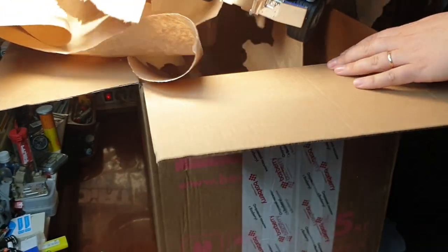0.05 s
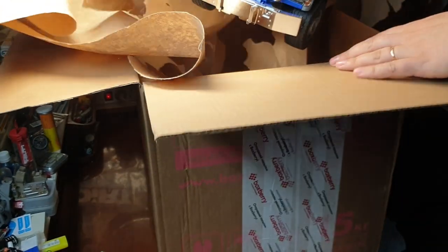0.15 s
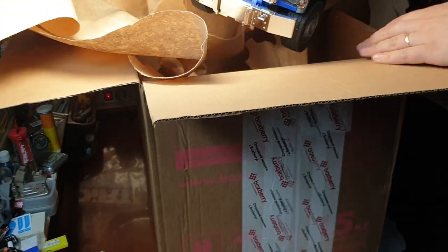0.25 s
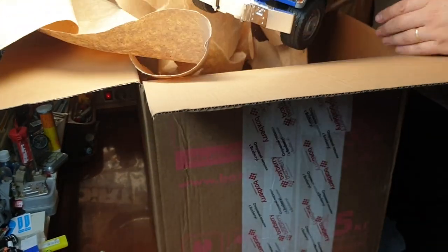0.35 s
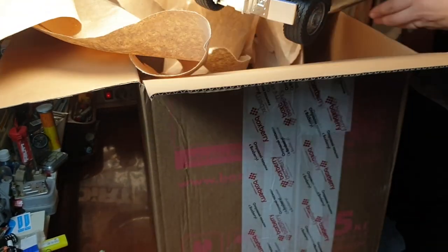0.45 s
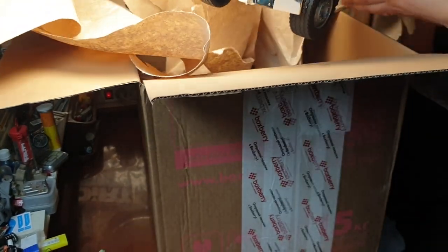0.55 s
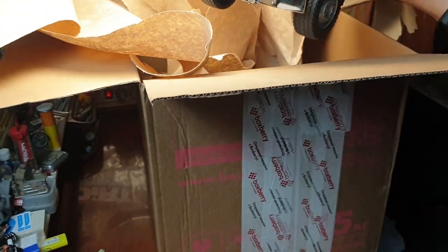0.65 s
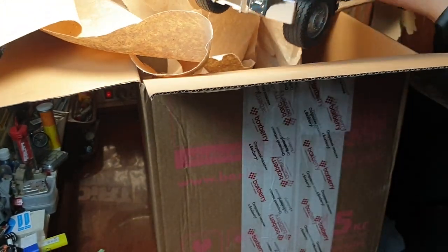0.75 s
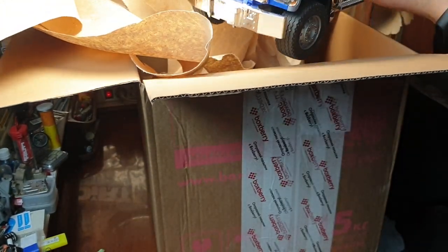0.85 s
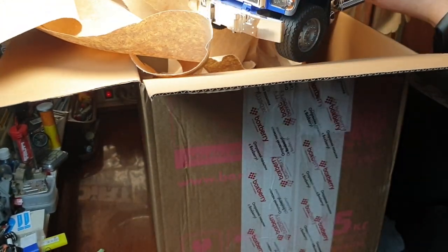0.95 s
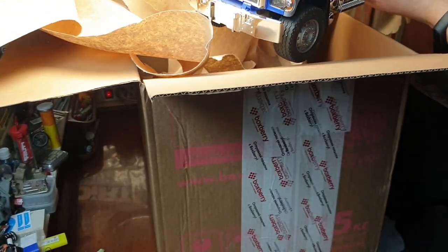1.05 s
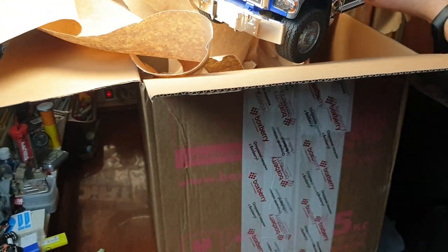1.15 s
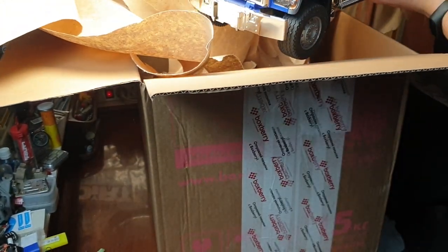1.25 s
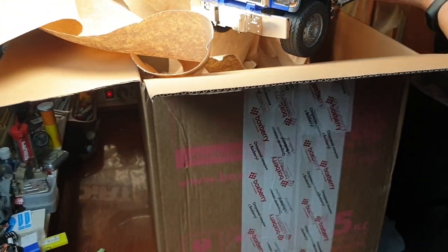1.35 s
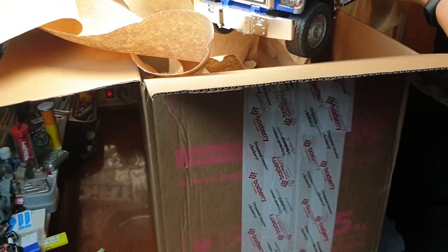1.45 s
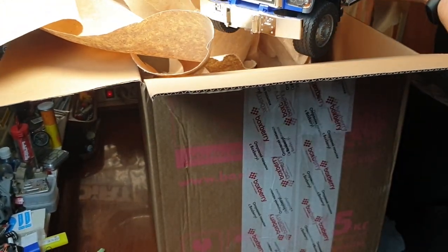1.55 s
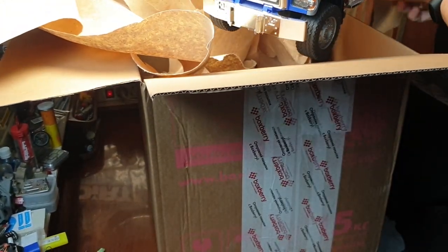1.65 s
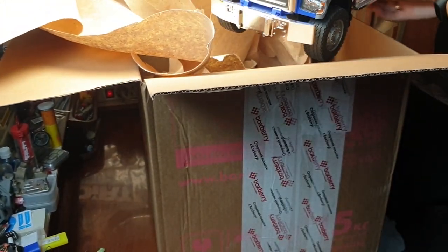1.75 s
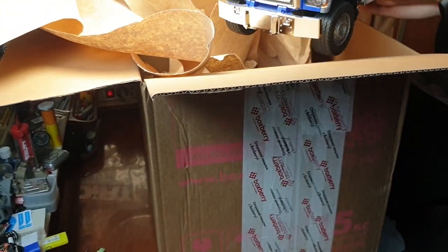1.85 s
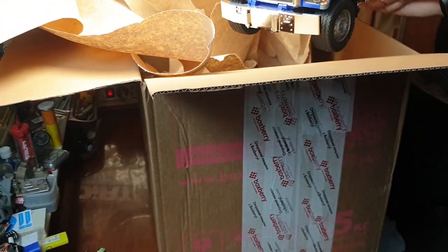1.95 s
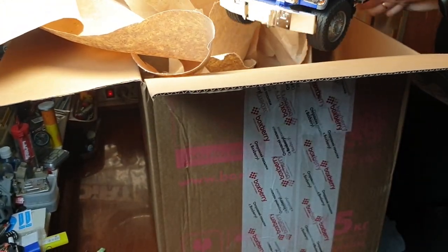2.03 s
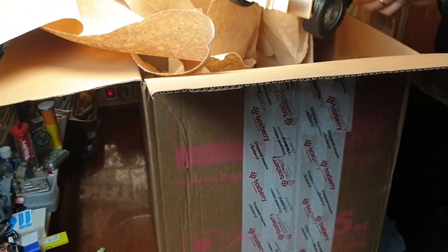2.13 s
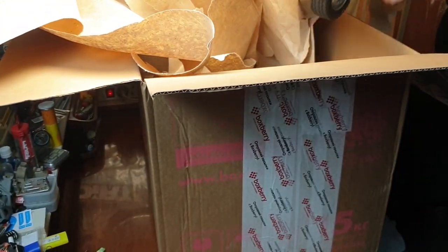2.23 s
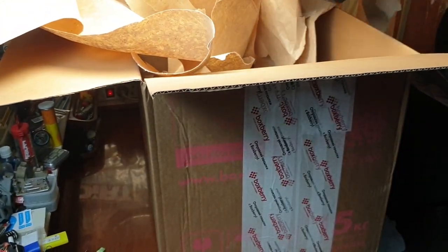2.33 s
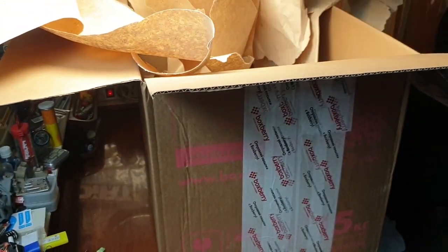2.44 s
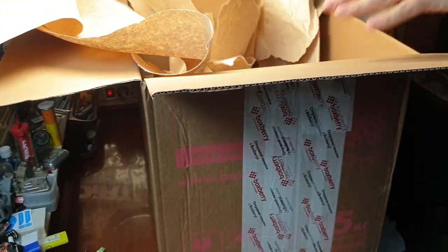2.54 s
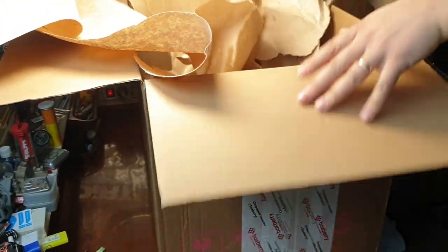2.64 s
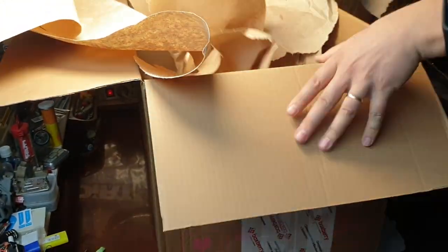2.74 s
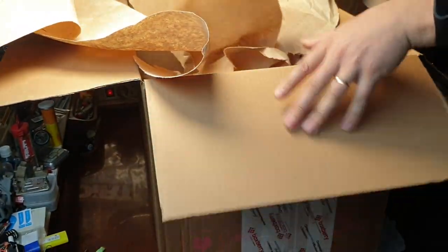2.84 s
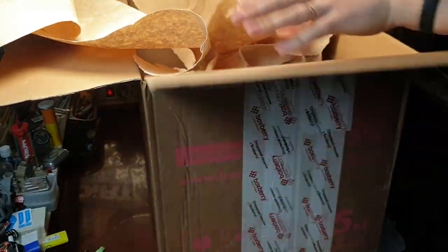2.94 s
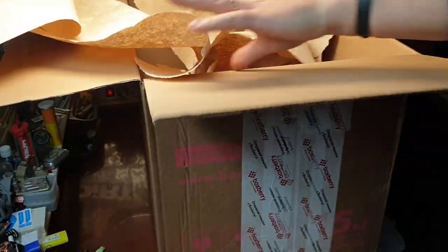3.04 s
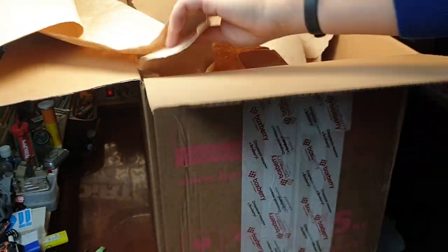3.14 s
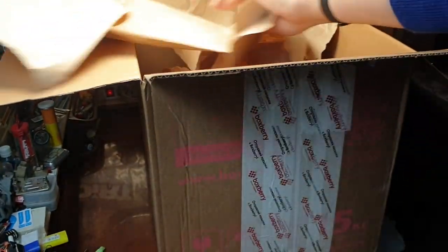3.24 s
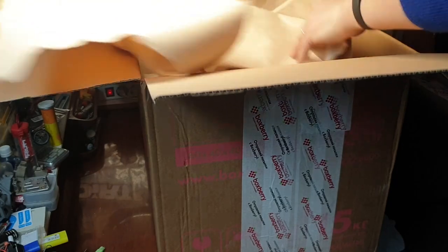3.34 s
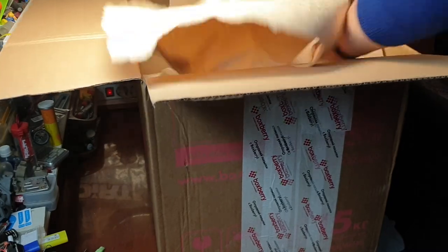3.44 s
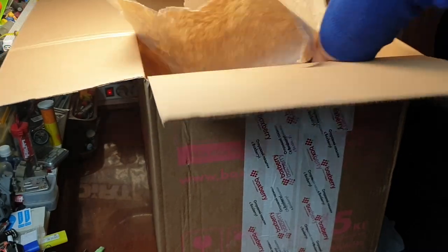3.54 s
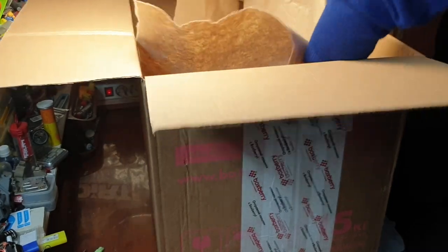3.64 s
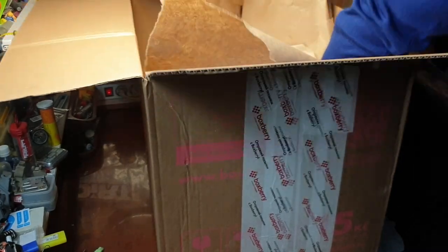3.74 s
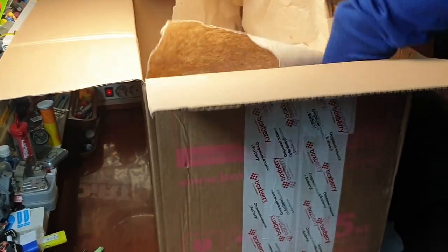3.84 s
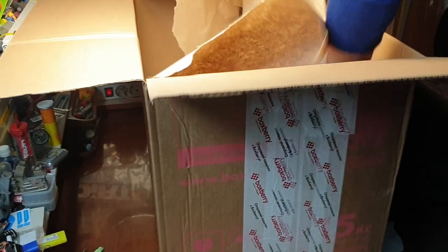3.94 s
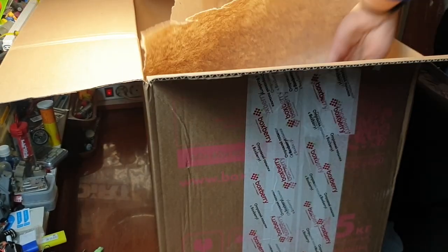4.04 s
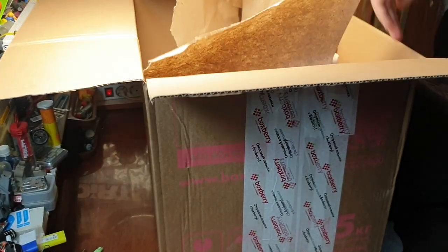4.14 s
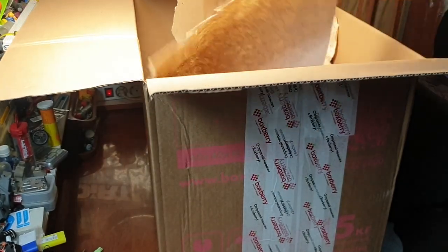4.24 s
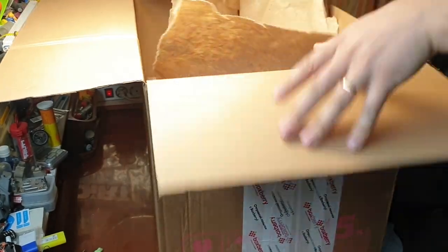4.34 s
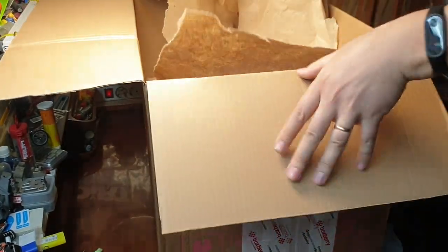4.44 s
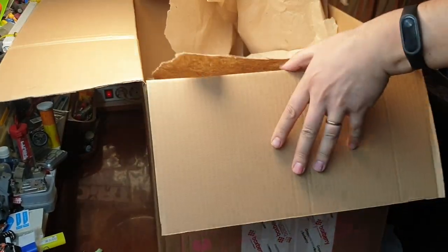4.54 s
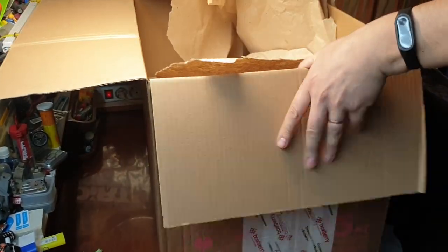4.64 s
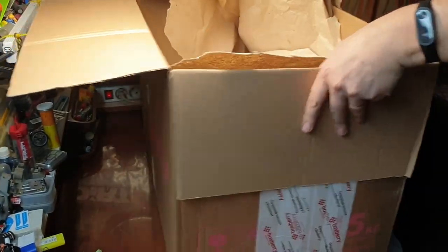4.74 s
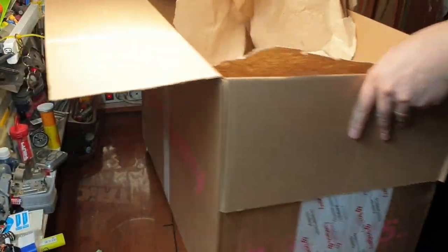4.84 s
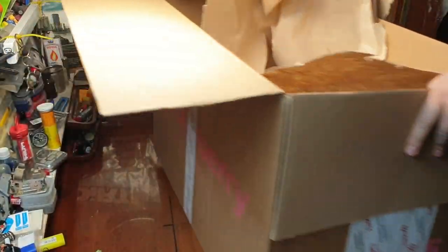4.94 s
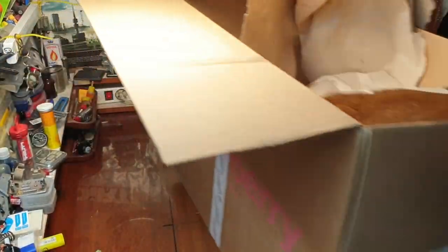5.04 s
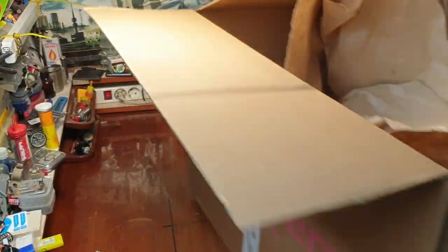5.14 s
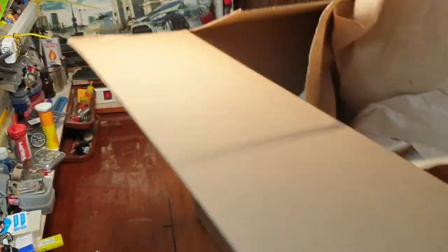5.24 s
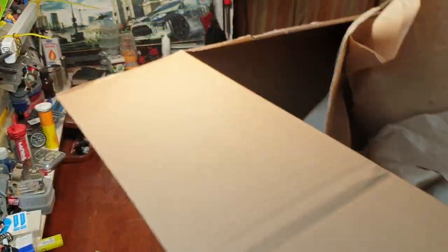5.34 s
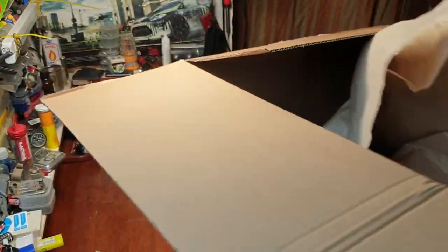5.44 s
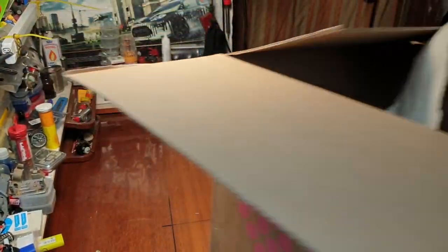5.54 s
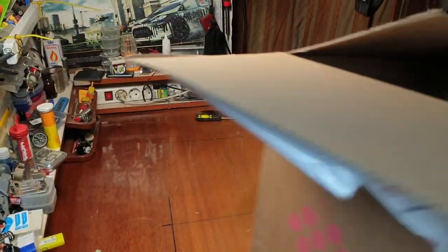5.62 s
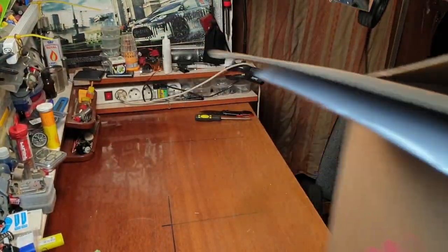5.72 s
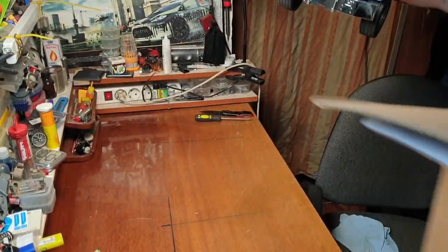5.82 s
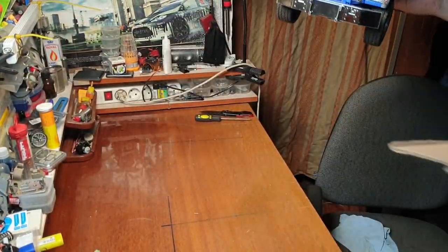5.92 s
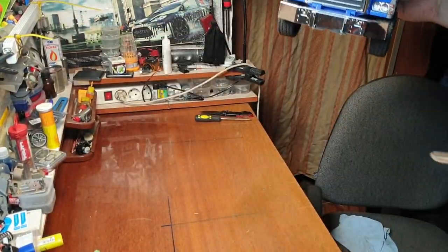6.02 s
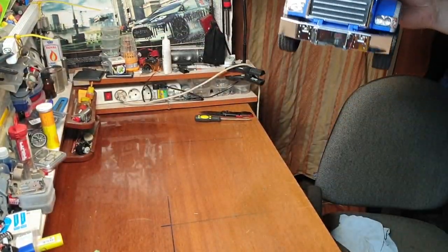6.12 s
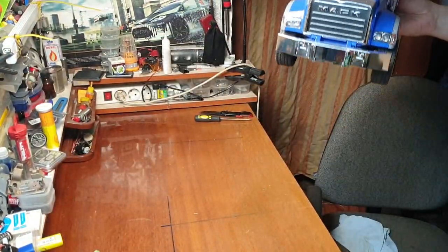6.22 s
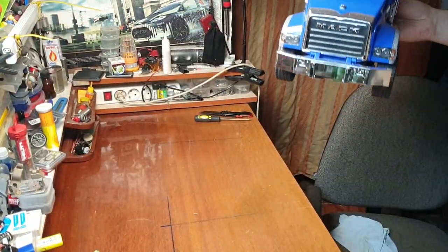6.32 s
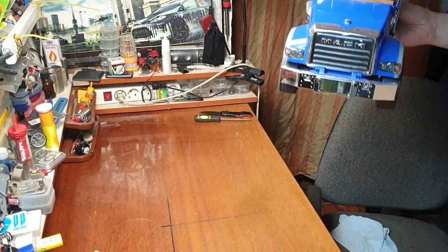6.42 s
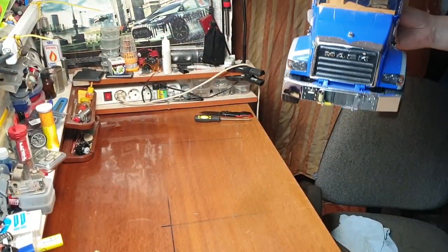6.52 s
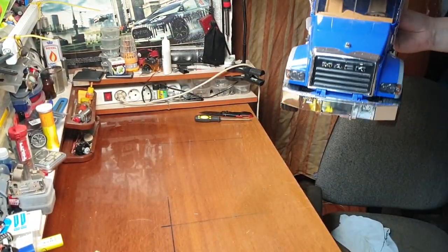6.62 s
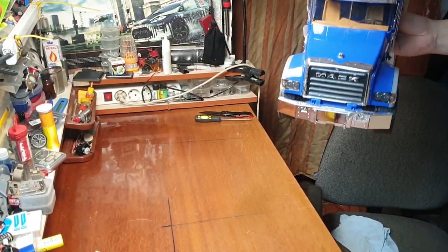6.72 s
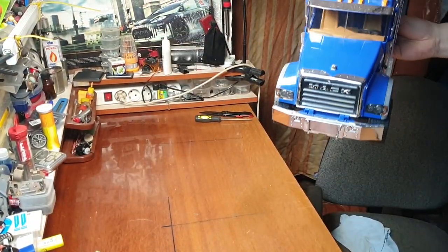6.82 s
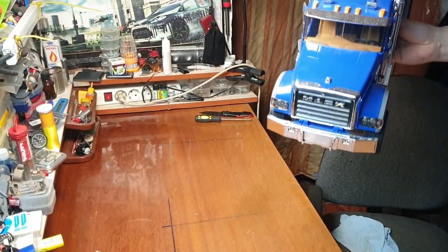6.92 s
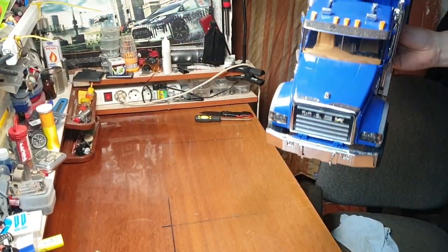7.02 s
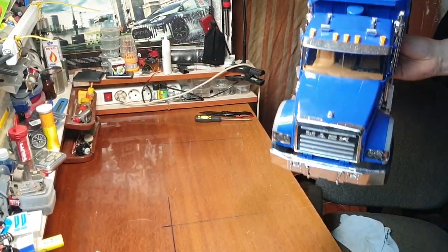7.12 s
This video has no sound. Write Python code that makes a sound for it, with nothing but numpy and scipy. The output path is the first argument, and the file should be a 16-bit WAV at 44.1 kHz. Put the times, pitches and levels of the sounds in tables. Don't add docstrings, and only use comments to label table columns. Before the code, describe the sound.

Kraft paper crumples in a big cardboard box between dull knocks and flap thumps, with a quiet lull early on, heard close indoors.

```python
import sys
import numpy as np
from scipy import signal
from scipy.fft import rfft, irfft, next_fast_len
from scipy.io import wavfile

SR = 44100
rng = np.random.default_rng(int(sys.argv[2]) if len(sys.argv) > 2 else 0)


def digitize_waveform(pressure):
    field = np.atleast_2d(pressure).T
    bounded = np.clip(field, -1, 1)
    quanta = np.round(bounded * 32767).astype(np.int16)
    wavfile.write(sys.argv[1], SR, quanta)


def gain_from_db(level_db):
    decades = np.asarray(level_db, float) / 20
    return 10 ** decades


N = 316356

# [f/Hz, width/Hz, level/dB]
CAVITY = [(48.6, 28, -4.5), (75, 30, 6.5)]
# [f/Hz, width/Hz, level/dB]
WALL = [(134, 8.4, 1.5), (159.2, 73, -10)]
# [f/Hz, width/Hz, level/dB]
FLAP = [(198, 18, -1), (254.6, 50, 2.5), (301, 90, -2), (381, 145, -3.5)]


def rms_one(x):
    return x / np.sqrt(np.mean(x ** 2) + 1e-20)


def in_time(rows):
    s, *columns = np.transpose(rows)
    return np.array([np.interp(np.arange(N) / SR, s, c) for c in columns])


def at_hz(points, hz):
    known_hz, db = np.transpose(points)
    return np.interp(np.log(hz), np.log(known_hz), db)


def drift(rate):
    every = 40
    r = np.exp(-2 * np.pi * rate * every / SR)
    white = rng.standard_normal(N // every + 2002)
    slow = signal.lfilter([1], [1, -2 * r, r * r], white)[2000:]
    return np.interp(np.arange(N) / every, np.arange(len(slow)), rms_one(slow))


def noise_bands(spectrum, low_hz):
    alike_hz = 1100
    edges = low_hz * 2 ** np.arange(0, np.log2(21000 / low_hz), .4)
    white = rng.standard_normal((2, 2, N))
    for k, (low, high) in enumerate(zip(edges, edges[1:])):
        band = signal.butter(2, [low, high], "band", fs=SR, output="sos")
        mid, side = signal.sosfilt(band, white[k % 2])
        hz = np.sqrt(low * high)
        alike = 1 / (1 + (hz / alike_hz) ** 2)
        stereo = np.sqrt(1 + alike) * mid + np.sqrt(1 - alike) * side * [[1], [-1]]
        yield hz, gain_from_db(at_hz(spectrum, hz)) * stereo


def resonate(x, modes):
    out = 0
    for k, (hz, width, db) in enumerate(modes):
        r = np.exp(-np.pi * width / SR)
        poles = [1, -2 * r * np.cos(2 * np.pi * hz / SR), r * r]
        out = out + (-1) ** k * gain_from_db(db) * signal.lfilter([1 - r, 0, r - 1], poles, x)
    return out


def background():
    # [f/Hz, level/(dB per Hz)]
    hush_spectrum = [(18, -40), (30, 10), (81, 1), (374, -40), (649, -14), (16000, -31)]
    return gain_from_db(-79) * rms_one(sum(band for hz, band in noise_bands(hush_spectrum, 23.3)))


def workshop(x):
    t60_s, wall_cut_hz = 0.21, 25000
    size = next_fast_len(N + SR)
    turn = np.exp(-2j * np.pi * np.arange(size // 2 + 1) / size)
    dull = np.exp(-2 * np.pi * wall_cut_hz / SR)
    echo = np.zeros((2, len(turn)), complex)
    lags = (np.geomspace(.0123, .039, 12) * SR).astype(int)
    for k, lag in enumerate(lags):
        loss = gain_from_db(-60 * lag / SR / t60_s) * (1 - dull) / (1 - dull * turn)
        loop = loss * np.exp(lag * np.log(turn))
        echo[k % 2] += (-1) ** (k // 2) * loop / (1 - loop)
    return irfft(echo * rfft(x, size), size)[:, :N]


def grip_parts():
    # [t/s, force level/dB, flaps flexing against the body/dB]
    grip = [(0, -35.5, -2.5), (.74, -54, 3), (.92, -44.5, -7.5), (1.1, -66, 2), (1.7, -66.5, -15),
            (1.84, -49, 7.5), (2.1, -61.5, 0), (2.39, -43, 2), (2.57, -54, 1.5), (3.47, -33.5, 6),
            (4.03, -45.5, 3.5), (4.55, -44, -6), (5.7, -44, -0.7), (5.88, -40.5, 6), (6.25, -60, 1),
            (6.6, -43.5, 8), (6.8, -48.5, -7), (7.17, -44.5, -1)]
    force_db, flex_db = in_time(grip)
    return force_db, force_db - 9 + flex_db, force_db - 7.5 + flex_db


def handling():
    out = 0
    for modes, level_db, apart in zip((CAVITY, WALL, FLAP), grip_parts(), (.32, .28, .1)):
        first_hz = modes[0][0]
        force = rng.standard_normal((2, N))
        broad = [(first_hz * 1.13, first_hz * 2.7, 0)]
        mid, side = resonate(resonate(force, modes), broad)
        scale = gain_from_db(level_db - 0.5 + 1.46 * drift(7.4)) / mid.std()
        out = out + scale * (mid + apart * side * [[1], [-1]])
    return out


def box_parts(db, place, reach_db):
    loss = reach_db * (np.arange(3) - place) ** 2
    return db - loss + loss.min()


def blows():
    # [t/s, level/dB, place (0 body, 1 wall, 2 flap), push/s, t60/s]
    sharp_knocks = [(0.03, -37, 0.6, .0012, 0.048), (1.786, -23.5, 0.13, 0.015, 0.13),
                    (2.638, -17, 1.14, 0.004, 0.18), (3.0044, -27, 0.86, 0.0042, 0.13),
                    (3.3403, -26.5, 1.5, 0.0017, 0.2), (3.6817, -20.5, 0.3, .006, 0.074),
                    (3.7518, -27.5, 2, 0.0054, 0.43), (3.783, -27.5, -0.5, 0.0014, 0.15),
                    (3.2, -27, 2.5, .005, 0.11), (4.1, -38, 1, .005, 0.13),
                    (5.764, -27, 0.5, 0.0035, 0.032), (4.353, -16.5, 0.87, 0.004, 0.22),
                    (4.414, -29, -1, .01, 0.07), (4.7681, -33, 1.1, .0014, 0.14),
                    (5.307, -37.5, 1.1, 0.0064, 0.45), (5.5478, -28, 10, 0.011, 0.11),
                    (5.576, -21, 1.13, 0.0093, .11), (5.785, -48, 0, .0012, 1),
                    (6.77, -29, -1.5, 0.0077, 0.075), (6.825, -39, 3.5, .0011, .35),
                    (6.907, -31, 2.5, 0.0063, 0.2)]
    # [t/s, level/dB, place (0 body, 1 wall, 2 flap), push/s, t60/s]
    shoves = [(.2961, -16, 1, 0.027, 0.063), (2.3812, -34, 1.87, .012, 0.39),
              (2.7542, -23, -1.3, 0.025, 0.11), (3.0677, -22, 0.9, .024, 0.16),
              (3.544, -9.5, -0.54, 0.045, 0.16), (5.13, -25, -0.68, .026, 0.099),
              (5.749, -12.5, 1.3, 0.02, 0.053), (6.3985, -28.5, 0.81, 0.014, 0.081),
              (6.6, -31, 1.5, .03, .29), (1.234, -54, 0.16, 0.045, 0.65), (5.945, -36, 2, .012, 0.11),
              (7.0, -27.5, 1.56, 0.013, 0.12)]
    # [t/s, level/dB, push/s, t60/s]
    booms = [
        (5.9013, -25.5, 0.046, 0.21),
        (6.524, -20.5, .024, 0.54),
        (6.635, -22.5, 0.014, 0.27),
        (3.41, -22, 0.03, 0.4),
        (6.91, -21, .006, 0.44),
    ]
    out = []
    for s, db, place, push, t60 in sorted(sharp_knocks + shoves):
        out.append((s, box_parts(db, place, 11), push, t60))
    for s, db, push, t60 in booms:
        out.append((s, box_parts(db, 1, 16), push, t60))
    return out


def caught(s, t):
    # [t/s, loss/dB]
    catches = [
        (4.383, 15),
        (5.772, 8),
        (2.705, 8),
    ]
    catch_s = 0.006
    return sum(loss_db * np.clip((s + t - at) / catch_s, 0, 1) for at, loss_db in catches if at > s)


def knocks():
    out = np.zeros(N)
    hits = blows()
    chance = rng.standard_normal((len(hits), 2, 9))
    for (s, part_db, push, t60), (detune, uneven) in zip(hits, chance):
        at = round(s * SR)
        t = np.arange(min(N - at, SR // 2)) / SR
        modes = []
        parts = zip((CAVITY, WALL, FLAP), part_db, (2.5, 2.5, -1.5), (1.45, 1, .6))
        for part, blow_db, more_db, pace in parts:
            modes += [(hz, db + blow_db + more_db, pace) for hz, width, db in part]
        for (hz, db, pace), d, u in zip(modes, detune, uneven):
            swell = 1 - np.exp(-t / (max(push, .0005) * pace))
            decay_db = caught(s, t) + 60 * t / (max(t60, .02) * pace)
            tone = np.sin(2 * np.pi * hz * (1 + 0.028 * d) * t)
            out[at:at + len(t)] += gain_from_db(db + 0.24 * u - decay_db) * swell * tone
    return out


def rings():
    # [t/s, f/Hz, level/dB,
    # t60/s]
    lone_notes = [(5.33, 74, -31, .7), (5.306, 205, -35, .08), (3.598, 80, -23, .15),
                  (6.908, 1250, -33, .05), (5.746, 1500, -36, .03), (3.198, 850, -22, .03),
                  (3.223, 830, -26, .04), (6.0, 70, -38, .3), (4.768, 245, -31, .08),
                  (4.766, 680, -38, .06), (6.034, 4900, -31, .04), (6.034, 6000, -35, .03),
                  (.705, 2720, -33, .045), (.167, 2160, -33, .04), (.291, 931, -34, .05),
                  (.291, 3100, -38, .05), (.86, 1400, -44, .1), (.852, 423, -42.5, 0.16),
                  (3.765, 596, -31, 0.57), (4.02, 1870, -16, 0.02), (4.351, 628, -20.5, 0.042),
                  (5.787, 453, -28, 0.11), (6.435, 763, -29.5, 0.07), (6.53, 655, -34.5, 0.4),
                  (6.605, 401, -26.5, 0.16), (5.905, 188, -29.5, 0.19), (2.64, 199, -17, 0.076),
                  (6.907, 410, -23.5, 0.15), (6.907, 679, -20, 0.059)]
    out = np.zeros(N)
    for s, hz, db, t60 in lone_notes:
        at = round(s * SR)
        t = np.arange(min(N - at, SR // 3)) / SR
        strike = 1 - np.exp(-t / 0.0012)
        out[at:at + len(t)] += gain_from_db(db - 60 * t / t60) * strike * np.sin(2 * np.pi * hz * t)
    return out


def squeaks():
    # [t/s, length/s, start f/Hz, end f/Hz, level/dB]
    catching = [(0.71, 0.03, 2720, 2700, -57), (2.255, .075, 690, 720, -50), (2.3, .025, 2950, 2950, -54),
                (2.232, .05, 2500, 2450, -56), (4.935, .04, 1480, 1470, -52), (4.487, .03, 910, 900, -54),
                (5.713, .025, 870, 870, -52), (6.035, .035, 860, 880, -50), (1.13, .08, 7300, 7350, -76),
                (1.05, .07, 5800, 5900, -75), (6.07, .03, 2200, 2200, -55), (1.531, 0.044, 1280, 1300, -66),
                (1.54, 0.073, 820, 630, -64), (2.1, 0.084, 2890, 2860, -57),
                (2.88, 0.054, 1514, 1493, -52.5), (4.5, 0.23, 4840, 4770, -56.5),
                (4.876, 0.0616, 1480, 1480, -54), (4.875, 0.062, 890, 873, -54.5),
                (2.245, 0.063, 2950, 2900, -53), (4.49, 0.076, 1500, 1480, -58),
                (5.925, .08, 768, 746, -55), (6.032, 0.018, 5200, 4520, -37.5)]
    out = np.zeros((2, N))
    waver = signal.lfilter([1], [1, -.995], rng.standard_normal((2, 2, N)))
    own = waver[0] + 1j * waver[1]
    common = waver[0, :1] + 1j * waver[1, :1]
    waver = (own + 1.43 * common) / waver.std() / 0.99
    for s, length, start_hz, end_hz, db in catching:
        at, count = round(s * SR), round(length * SR)
        turn = np.exp(2j * np.pi * np.cumsum(np.geomspace(start_hz, end_hz, count)) / SR)
        tone = (turn * waver[:, at:at + count]).real
        out[:, at:at + count] += gain_from_db(db) * signal.windows.tukey(count, .5) * tone
    return out


def chatter():
    # [t/s, length/s, f/Hz, level/dB]
    runs = [(0.177, 0.036, 990, -47), (0.211, 0.026, 1480, -48), (2.362, 0.024, 3310, -44),
            (2.376, 0.024, 1240, -40), (2.38, 0.018, 1970, -40), (2.795, 0.024, 4950, -44),
            (3.019, 0.028, 3930, -39), (3.091, 0.024, 2630, -43), (3.199, 0.038, 1760, -40),
            (3.219, 0.02, 740, -38), (3.242, 0.03, 1050, -41), (3.252, 0.026, 1860, -40),
            (3.24, 0.046, 7000, -36), (3.276, 0.022, 990, -33), (3.316, 0.02, 4680, -38),
            (3.332, 0.02, 1110, -32), (3.374, 0.018, 1170, -37), (3.394, 0.032, 390, -42),
            (3.416, 0.022, 1110, -34), (3.42, 0.044, 350, -41), (3.464, 0.04, 1050, -37),
            (3.482, 0.022, 700, -32), (3.486, 0.018, 1110, -33), (3.526, 0.018, 350, -40),
            (3.536, 0.016, 660, -38), (3.588, 0.02, 2630, -42), (3.584, 0.032, 520, -40),
            (3.63, 0.016, 700, -42), (3.638, 0.016, 420, -45), (3.687, 0.02, 590, -42),
            (3.731, 0.02, 620, -39), (3.723, 0.03, 1660, -43), (3.799, 0.022, 3710, -42),
            (3.857, 0.022, 620, -42), (3.903, 0.024, 740, -45), (4.011, 0.022, 1320, -44),
            (4.342, 0.026, 3120, -36), (4.711, 0.018, 1480, -43), (4.935, 0.02, 1480, -46),
            (6.515, 0.024, 350, -46), (6.527, 0.022, 880, -43), (6.531, 0.05, 1050, -47),
            (6.609, 0.018, 740, -42), (6.621, 0.028, 440, -41), (6.922, 0.018, 440, -38),
            (6.988, 0.026, 590, -47)]
    slips_per_s, cycles, gain_db, late_s = 600, 9.0, 8, 0.007
    out, size = np.zeros((2, N)), SR // 12
    t = np.arange(size) / SR
    chance = rng.standard_normal((len(runs), 4, size))
    for (s, length, hz, db), (when, force, left, right) in zip(runs, chance):
        impulses = force * (np.abs(when) < 1.25 * slips_per_s / SR)
        drive = impulses + 0.12 * np.array([left, right])
        body = rms_one(resonate(drive, [(hz, hz / cycles, 0)]))
        at = round((s + late_s) * SR)
        fade = gain_from_db(db + gain_db - 20 * (t / max(length, .005)) ** 2.5)
        out[:, at:at + size] += fade * (1 - np.exp(-t / 0.0015)) * body
    return out


def buckling(per_s, spread_db, t60):
    born = rng.random(N) < per_s * gain_from_db(5.0 * drift(14)) / SR
    power = born * gain_from_db(2 * spread_db * np.minimum(rng.exponential(1, N), 4)) + 1e-18
    power = signal.lfilter([1], [1, -gain_from_db(-120 / (t60 * SR))], power)
    return power / power.mean()


def pings(count, cycles):
    size = gain_from_db(5.0 * np.minimum(rng.exponential(1, N), 1.2))
    size = size * (rng.random(N) < 350 * gain_from_db(5.0 * drift(14)) / SR)
    dealt, out = rng.integers(0, count, N), np.zeros((2, N))
    pitches = np.geomspace(480, 4800, count) * gain_from_db(0.32 * rng.standard_normal(count))
    for k, hz in enumerate(pitches):
        ring = resonate(size * (dealt == k) + 1e-18, [(hz, hz / cycles, 0)])
        pan_db = np.array([[1], [-1]]) * 6.6 * np.tanh(rng.standard_normal())
        out += ring * gain_from_db(pan_db) * (480 / hz) ** 0.75
    return rms_one(out)


def sheet_parts(db, rub_db, flex_db, hiss_db):
    return np.array([db + flex_db - rub_db, db, db + hiss_db + rub_db])


def contacts():
    # [t/s, level/dB, rubbing against bending/dB, t60/s]
    ticks = [(.115, -32.5, 1.5, 0.04), (.1666, -28.5, 0, 0.05), (.274, -47, 1, .024),
             (0.7045, -41, 3, 0.05), (1.51, -52.5, 6, 0.2), (1.8995, -44.5, 6, 0.11),
             (2.804, -33, 7, 0.097), (3.198, -19.5, 0, .082), (3.222, -26, 6, 0.11),
             (3.451, -25.5, -6, 0.45), (3.487, -24, -11, 0.073), (3.517, -27, -17.5, 0.071),
             (3.97, -39, 0, 0.34), (4.018, -28.5, 2.5, 0.23), (4.274, -37, -7, 0.18),
             (4.35, -21.5, 3, 0.049), (4.938, -39, -4, 0.21), (4.717, -31, 2, .04), (3.742, -25, -5, .05),
             (3.159, -30, 0, .05), (5.746, -41, -6, .03), (4.49, -43, 6, .05), (5.3144, -36, 5, 0.57),
             (5.8404, -42.5, 18, .166), (6.034, -33, 8.5, 0.13), (6.821, -41, -6, .08),
             (4.28, -36, -3, .04), (.29, -47, 1.5, .04), (2.379, -28, -4, 0.06), (1.826, -51, 10, .06)]
    # [t/s, level/dB, rubbing against bending/dB, t60/s]
    fold_slips = [(.074, -42, -3, .022), (.5318, -39, 2.5, 0.35), (.64, -46, 0, .25),
                  (0.852, -42, -3.5, 0.091), (.897, -46.5, -1, 0.48), (1.822, -45, -7, 0.078),
                  (1.863, -47.5, -8, 0.13), (2.3782, -32, -3.5, 0.087), (2.786, -37, 7.5, 0.077),
                  (2.878, -33.5, 6.5, 0.14), (3.03, -28.5, 5, 0.064), (3.147, -30.5, 4.5, .11),
                  (3.169, -26.5, -1, .137), (3.255, -26, 7, 0.18), (3.2842, -25.5, -5, 0.056),
                  (3.3362, -24, -2, 0.11), (3.409, -22.5, -5, 0.1), (4.073, -35, 0.5, .084),
                  (4.248, -36.5, 6.5, .043), (4.406, -38, 4.5, 0.051), (4.672, -37.5, 6, 0.12),
                  (4.695, -31.5, 1.5, 0.073), (4.706, -29.5, 6, 0.23), (4.904, -51, 10, .23),
                  (5.862, -42, 12.5, 0.25), (6.485, -35, 6, 0.044), (6.904, -36.5, 1, .23),
                  (7.004, -41, -9.5, 0.019)]
    # [t/s, level/dB, rubbing against bending/dB, t60/s, length/s]
    rubs = [(.342, -37, 7.5, 0.072, 0.077), (1.053, -61, 2.5, 0.29, 0.12), (1.358, -60, 2.5, 0.3, 0.14),
            (1.526, -57, 5.5, .15, 0.046), (2.25, -39.5, 3.5, .167, 0.031), (2.64, -39, 4.5, 0.13, 0.12),
            (3.069, -30.5, 7, 0.027, 0.044), (3.735, -29.5, -6, 0.41, 0.07),
            (4.4916, -39, 8.5, 0.25, 0.029), (5.082, -47.5, 1, .34, 0.05), (5.391, -38, 5, 0.26, .043),
            (5.5705, -38, -2, 0.083, 0.054), (6.328, -50.5, 3, .2, 0.12), (6.504, -32, 3, 0.43, .085),
            (6.601, -36, -9, 0.032, 0.033), (6.824, -42, 0.5, .34, 0.13), (6.943, -39.5, 4, 0.55, 0.091)]
    # [t/s, level/dB, rubbing against bending/dB, t60/s]
    scuffs = [
        (2.1615, -59.5, -10, 0.093),
        (2.632, -41.5, -3, .026),
        (5.306, -52, 0.5, 0.016),
        (5.7294, -52.5, 7.5, 0.082),
        (5.745, -50.5, -6.5, 0.02),
        (5.795, -52.5, 0, 0.14),
        (6.429, -52.5, -4, .018),
        (4.871, -63, -9, .14),
        (5.0, -52.5, -3, 0.086),
    ]
    kinds = ((ticks, (-11.5, -11.5), 0.0041), (fold_slips, (-8.5, -8), 0.021),
             (rubs, (-6, -6), None), (scuffs, (4.5, 6.5), 0.01))
    out = []
    for rows, parts_db, hold in kinds:
        for s, db, rub_db, t60, *length in rows:
            out.append((s, sheet_parts(db, rub_db, *parts_db), hold or length[0], t60))
    return out


def snaps():
    out = np.full((3, N), 1e-12)
    for s, part_db, hold, t60 in contacts():
        at = round(s * SR)
        t = np.arange(min(N - at, SR // 2)) / SR
        start = 1 - np.exp(-t / (0.00043 + 5.7 * hold ** 2))
        after = np.maximum(t - hold, 0)
        for part, db, stretch, crack in zip(out, part_db, (1.3, 1, .8), (.8, 3.5, .2)):
            decay = gain_from_db(db - 60 * after / (np.clip(t60, .01, .35) * stretch)) ** 2
            part[at:at + len(t)] += start * (1 + crack * np.exp(-t / 0.0017)) * decay
    return out


def paper():
    # [f/Hz, level/(dB per Hz)]
    paper_spectrum = [(210, -35), (350, -5.5), (514, -10.5), (613, 3), (871, -2.5), (1160, -5), (1410, -9),
                      (2000, -11.5), (2940, -16.5), (6750, -14.5), (8850, -13), (13600, -14), (16000, -18)]
    # [t/s, effort level/dB, rubbing against bending/dB]
    crumpling = [(0, -39.5, 1.5), (.33, -36, 2), (.78, -59, 0), (1.17, -67, 7), (1.25, -78, 6),
                 (1.71, -73.5, 5), (1.83, -53, -4.5), (2.15, -54.5, 2.5), (2.33, -40.5, 1.5),
                 (3.1, -44, 1.5), (3.35, -29, 2), (3.65, -31, 0), (3.9, -42, 3.5), (5.1, -49.5, 2),
                 (6.1, -45.5, 1), (6.27, -61.5, 1), (6.47, -49, -1), (7.17, -49.5, 1.5)]
    split_hz, part_hz = (1500, 6000), (800, 3000, 10000)
    shared = buckling(200, spread_db=-1.0, t60=0.03)
    own = [buckling(150, spread_db=3.5, t60=0.012) for k in range(4)]
    bands = list(noise_bands(paper_spectrum, 381.2))
    part_of = [np.searchsorted(split_hz, hz) for hz, band in bands]
    usual = np.bincount(part_of, [band.var() for hz, band in bands])[:, None]
    rustle = gain_from_db(sheet_parts(*in_time(crumpling), -6, -5)) ** 2
    slips = snaps()
    rustle_db, slips_db = 10 * np.log10(rustle / usual), 10 * np.log10(slips / usual)
    flex, crackle, hiss = rustle + slips
    harder = (hiss / gain_from_db(-98)) ** 0.068 * (hiss / crackle) ** 0.06
    out = gain_from_db(-7) * (flex * crackle) ** .25 * pings(count=28, cycles=38.0)
    for k, (hz, band) in enumerate(bands):
        grainy = np.clip(.65 - 0.19 * np.log2(hz / 1400) ** 2, .1, .9)
        grain = 1 - grainy + grainy * (0.46 * shared + 0.42 * own[k // 2 % 4])
        shares = [np.interp(np.log(hz), np.log(part_hz), one) for one in np.eye(3)]
        steady = grain * gain_from_db(shares @ rustle_db + 2.0 * drift(11.6)) ** 2
        sudden = grain ** 0.33 * gain_from_db(shares @ slips_db) ** 2
        if hz > part_hz[2]:
            band = band * harder
        out = out + band * np.sqrt(steady + sudden)
    return out


def placed(x):
    # [t/s, left minus right level/dB, left lag/ms]
    whereabouts = [
        (0, 4, 0.12),
        (5.3, 3, 0.081),
        (5.55, -2.5, 0.3),
        (5.85, -2.5, 0.3),
        (5.95, 1.5, 0.3),
        (6.15, 1.3, 0.36),
        (7.17, 2, 0.25),
    ]
    pan_db, lag_ms = in_time(whereabouts)
    lag = np.round(lag_ms * SR / 1000).astype(int)
    left = x[0, np.maximum(np.arange(N) - lag, 0)]
    return np.array([left * gain_from_db(pan_db / 2), x[1] * gain_from_db(-pan_db / 2)])


def scene():
    close = placed(paper() + squeaks() + handling() + knocks() + rings() + chatter())
    high = signal.butter(2, 220, "high", fs=SR, output="sos")
    room = gain_from_db(-15.5) * workshop(signal.sosfilt(high, close.mean(axis=0)))
    return close + room + background()


def low_pass(x):
    return signal.sosfilt(signal.butter(12, 17000, fs=SR, output="sos"), x)


def record(dry):
    bass_cut = signal.butter(2, 45, "high", fs=SR, output="sos")
    coloured = signal.sosfilt(bass_cut, dry)
    coloured = coloured - 0.45 * resonate(coloured, [(9030, 2870, 0)])
    top_cut = signal.ellip(10, .5, 70, 15720, fs=SR, output="sos")
    return low_pass(signal.sosfilt(top_cut, coloured))


dry = scene()
out = record(dry)
digitize_waveform(out)
```